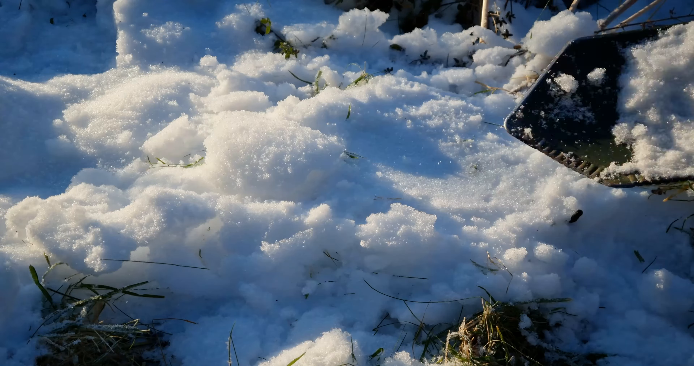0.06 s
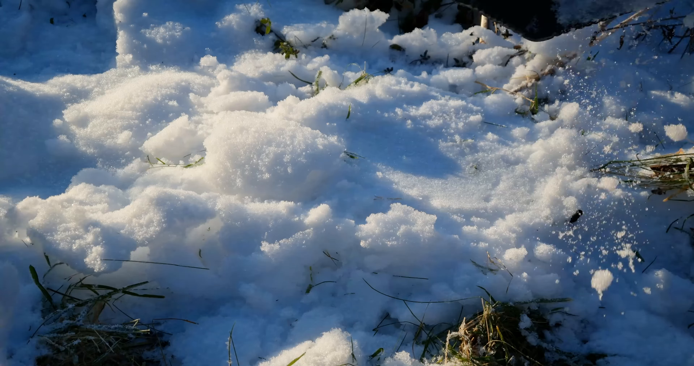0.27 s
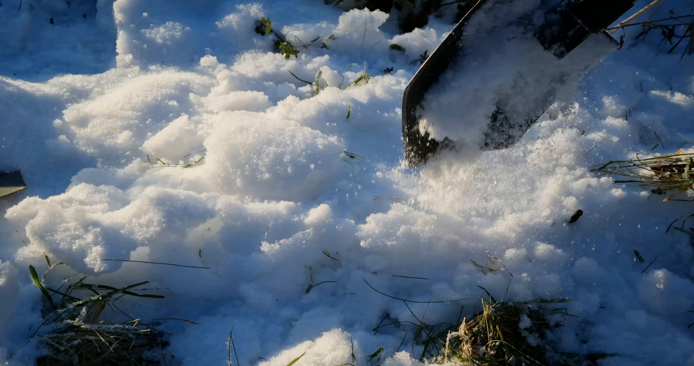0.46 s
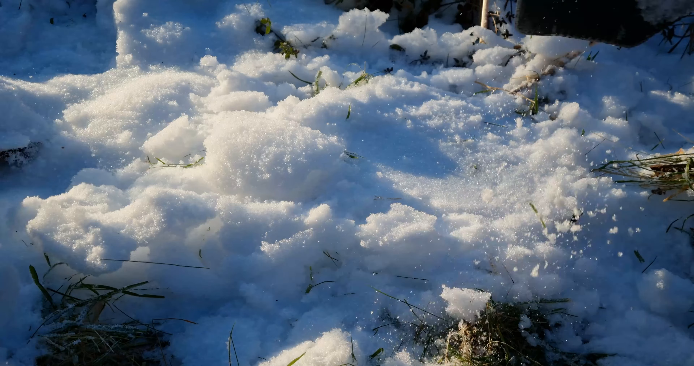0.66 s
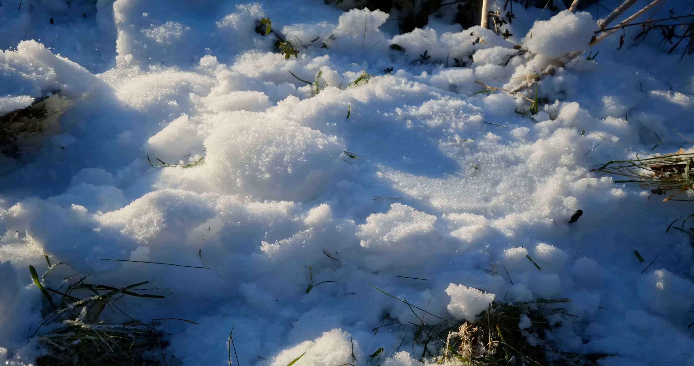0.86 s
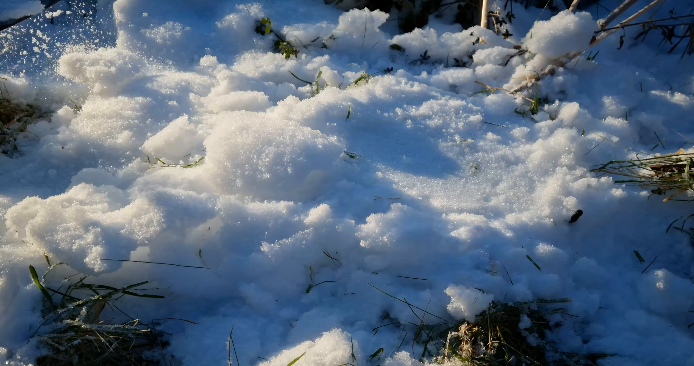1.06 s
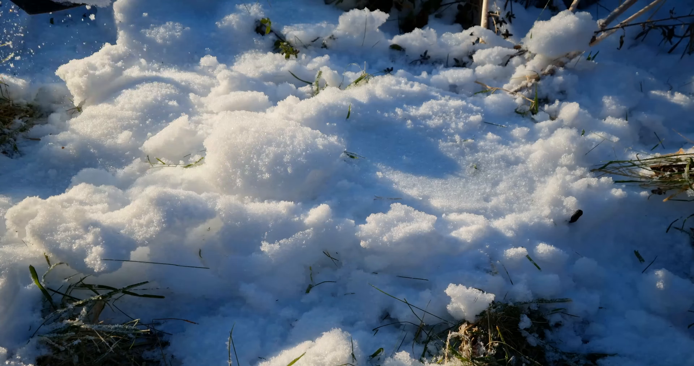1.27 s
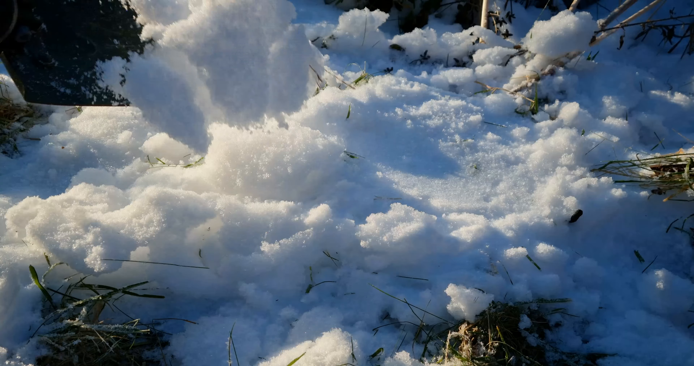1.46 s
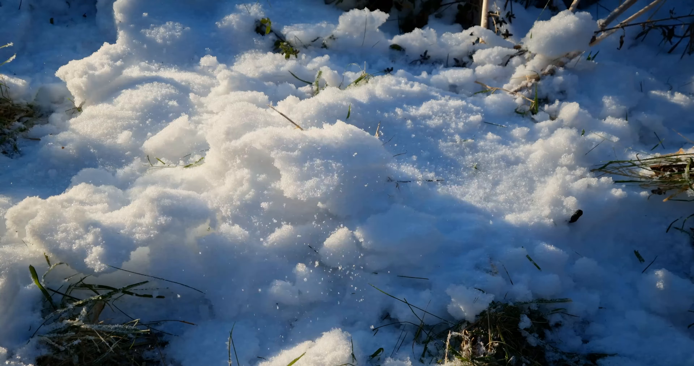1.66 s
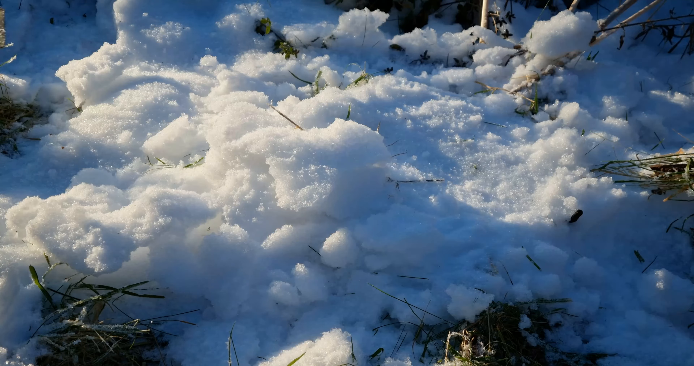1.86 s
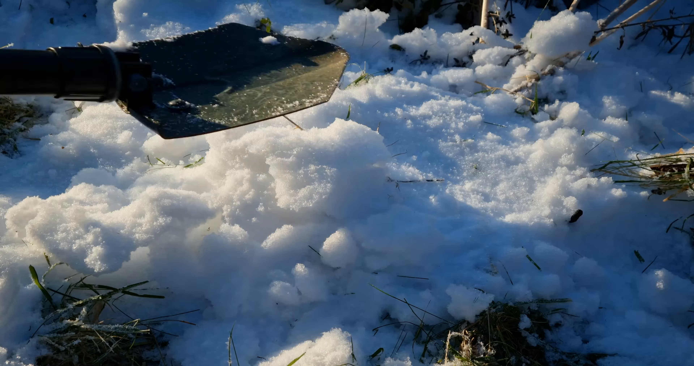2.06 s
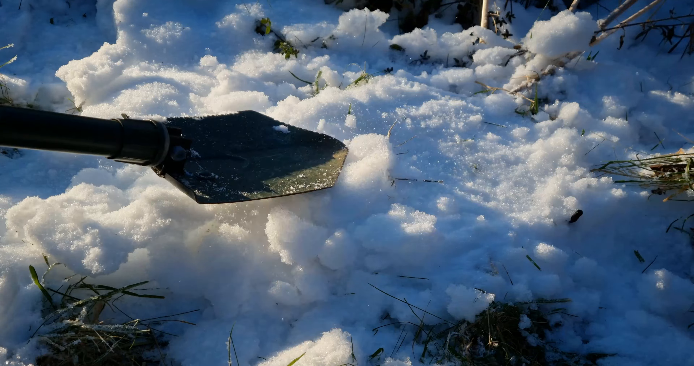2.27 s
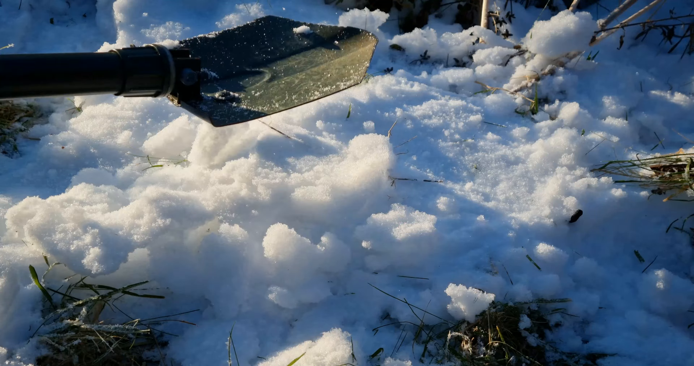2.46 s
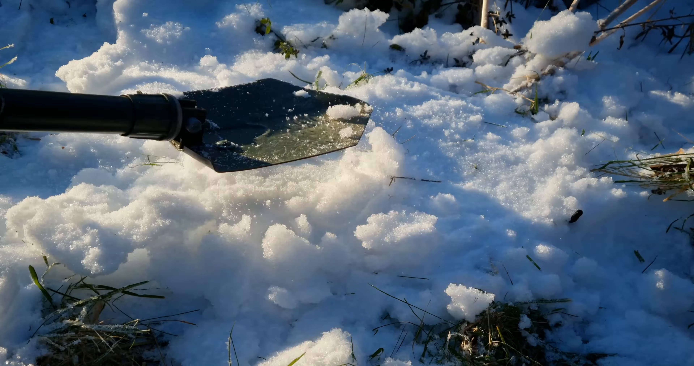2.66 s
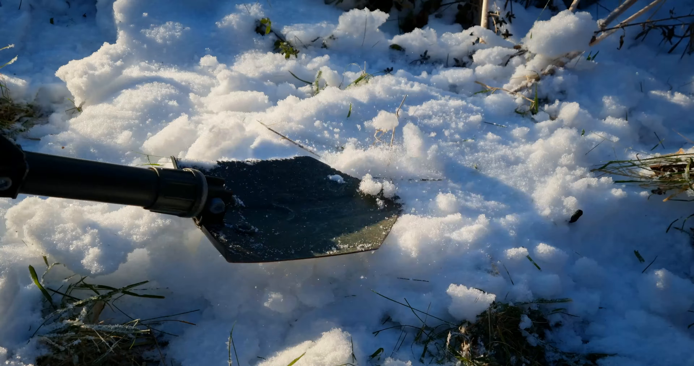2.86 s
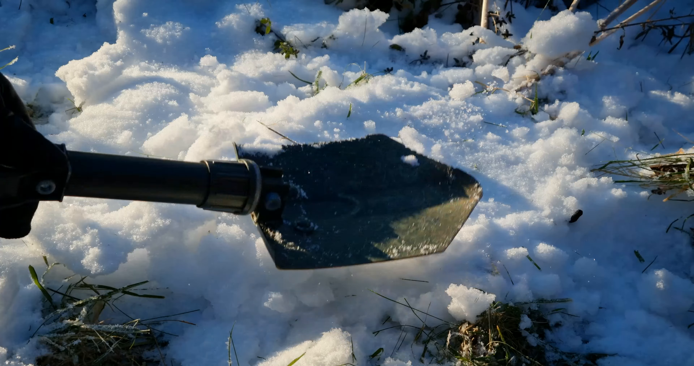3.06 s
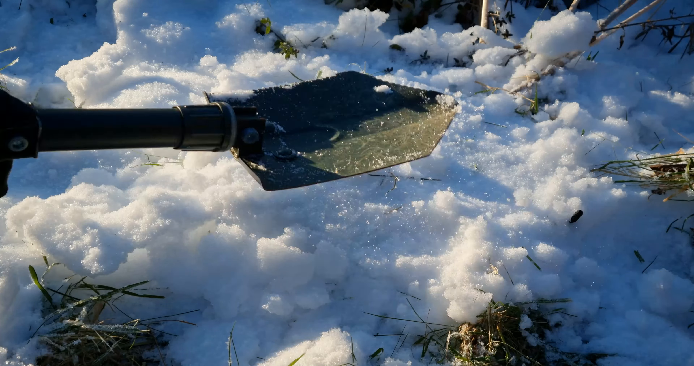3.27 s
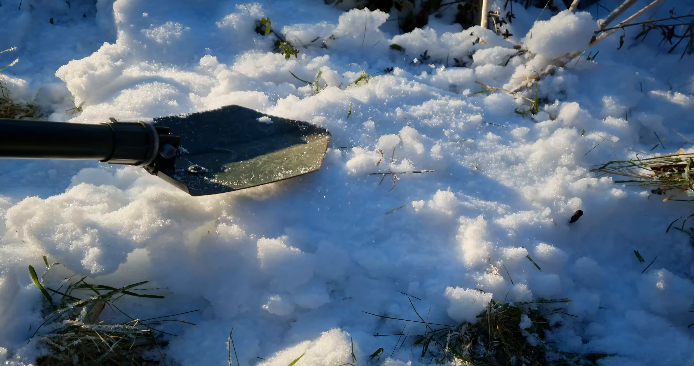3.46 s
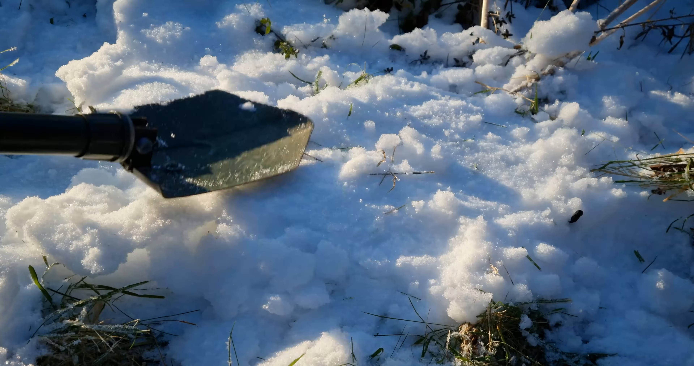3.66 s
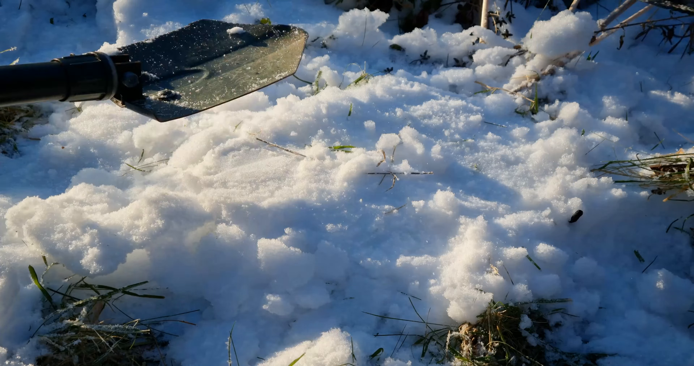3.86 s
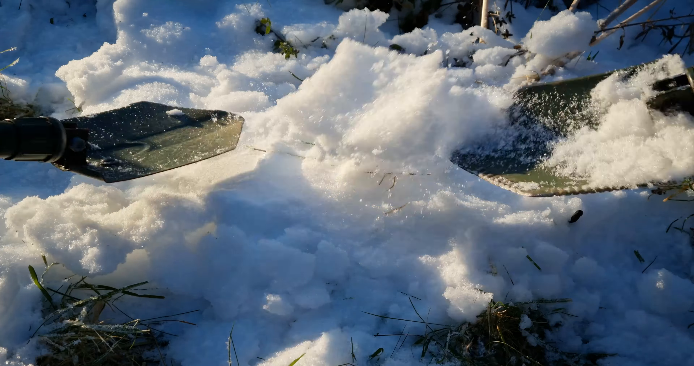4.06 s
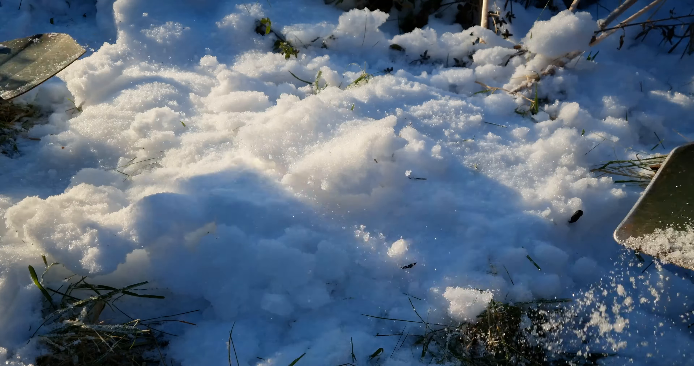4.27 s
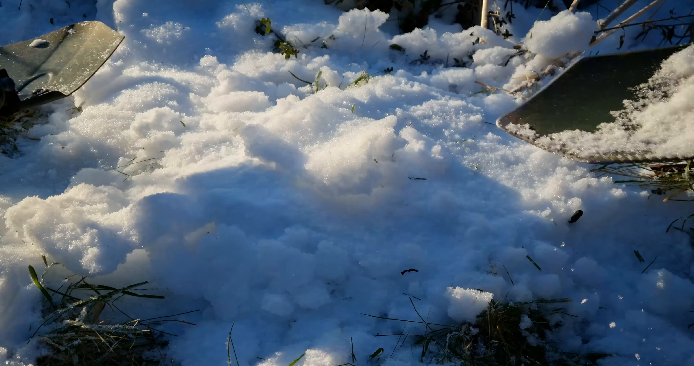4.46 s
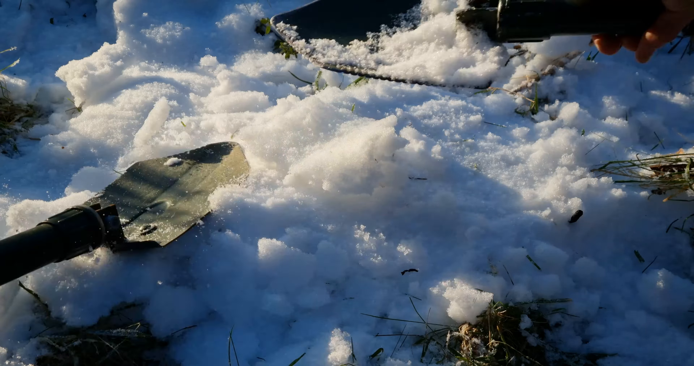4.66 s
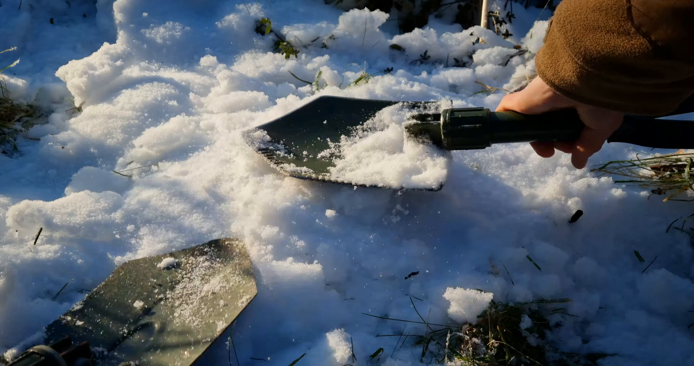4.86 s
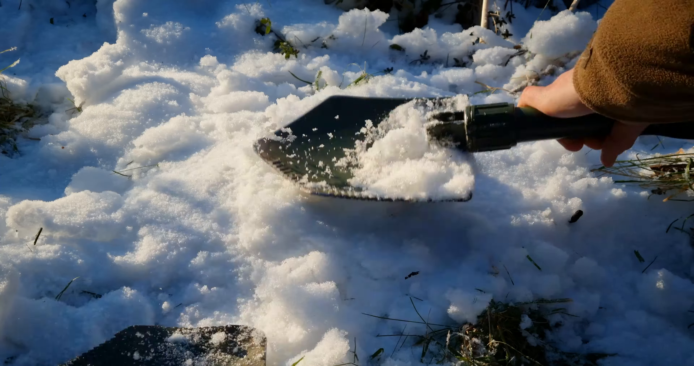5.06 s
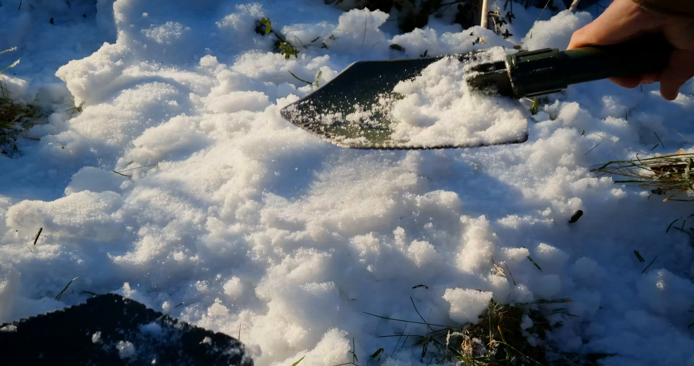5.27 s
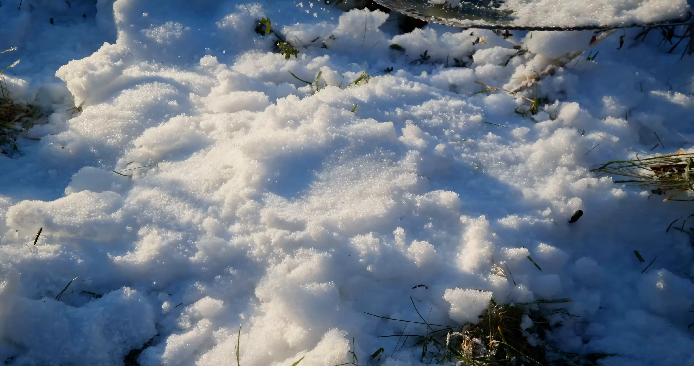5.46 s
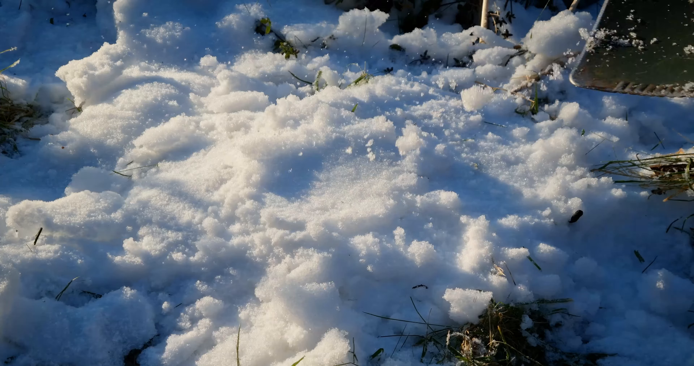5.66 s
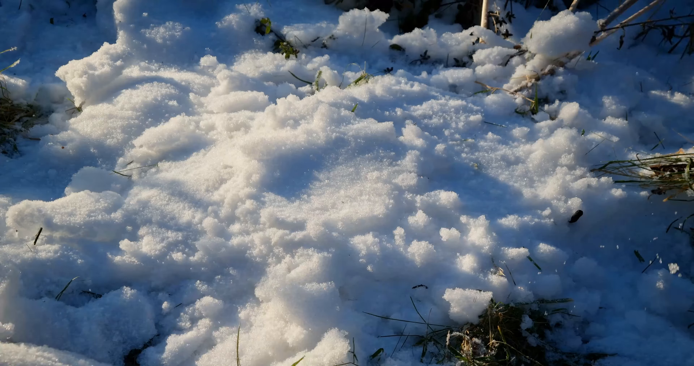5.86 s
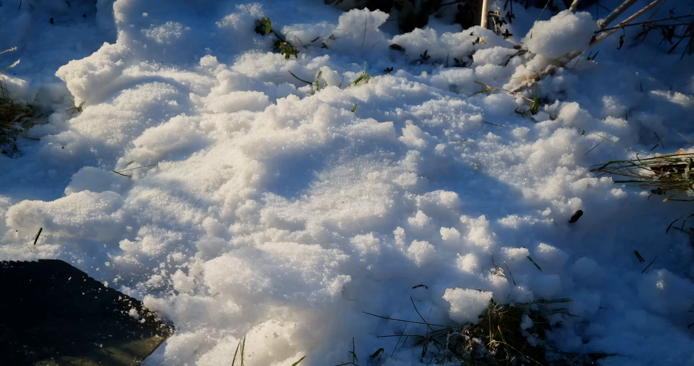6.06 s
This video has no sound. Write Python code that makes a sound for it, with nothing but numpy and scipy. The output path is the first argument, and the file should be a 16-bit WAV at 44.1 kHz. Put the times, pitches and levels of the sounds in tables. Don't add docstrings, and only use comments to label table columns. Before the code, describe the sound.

Two small steel shovels scrape, dump and pat crusty snow outdoors, with crisp bright crunches, brief metallic rings and a faint low hum.

```python
import sys
import numpy as np
from scipy import signal
from scipy.fft import rfft, irfft
from scipy.io import wavfile
from scipy.ndimage import map_coordinates

SR = 44100
rng = np.random.default_rng(int(sys.argv[2]) if len(sys.argv) > 2 else 0)


def natural_amplitude(level_db):
    exponent = np.asarray(level_db, float) / 20
    return 10 ** exponent


def put_to_file(sound):
    columns = np.atleast_2d(sound).T
    safe = np.clip(columns, -1, 1)
    whole_steps = np.round(safe * 32767)
    wavfile.write(sys.argv[1], SR, whole_steps.astype(np.int16))


N = 269892
LEFT_CREST_DB = 17.5

# [peak t/s, crunch level/dB, rise t/s, fall t/s, lumps re crunch level/dB]
LEFT_PUSHES = [(0.502, -38, 0.04, 0.18, -4.5), (0.6, -37.5, 0.15, 0.17, -8), (0.715, -45.5, 0.2, 0.04, -7),
               (4.824, -29, 0.034, 0.062, -29), (5.01, -32.5, 0.26, 0.079, -6.5),
               (5.1, -50.5, 0.071, 0.15, -12), (3.515, -44.5, 0.044, 0.027, -5),
               (5.168, -35.5, 0.015, 0.034, -19), (5.81, -31, 0.039, 0.11, -8.5),
               (5.862, -34.5, 0.055, 0.046, -24), (5.94, -44, 0.098, 0.038, -30),
               (6.11, -51.5, 0.026, .1, -6)]
# [t/s, peak level/dB, fall in 10 ms level/dB]
LEFT_CRACKS = [(0.452, -18, 24), (0.4665, -16.5, 16), (0.4396, -39, 20), (0.4984, -21, 20),
               (2.474, -27, 18), (2.6642, -27, -3), (3.0565, -25, 5), (3.097, -22, 21), (3.172, -11, 5),
               (0.544, -17, 26), (4.664, -9, 7), (4.818, -24, 10), (5.005, -21, 36), (5.102, -35, 1.5),
               (5.16, -15.5, 18), (5.188, -42, 12), (5.7775, -16.5, 3.5), (5.939, -25, 28.5),
               (6.0781, -27, 10), (6.0915, -33, 16)]
# [f/Hz, level per Hz/dB]
LEFT_CRUNCH = [(300, -18), (700, -9.5), (1300, -11), (2400, -1.5), (4200, 0), (8000, 1.5), (11000, -3.5),
               (13500, 1.5), (15400, -13)]
# [f/Hz, level per Hz/dB]
LEFT_LUMPS = [(80, -22), (150, -42), (250, -9), (400, -16.5), (740, 1), (1200, -0.5), (1800, 14.5),
              (3000, -48.5), (6000, -57)]
# [from t/s, to t/s, f/Hz, width f/Hz, level/dB]
FIRST_SCRAPE_TONES = [(.448, .47, 5850, 80, 10), (.48, .565, 711, 50, 8), (.53, .6, 1530, 80, 11),
                      (.575, .645, 1690, 90, 12), (.65, .735, 2050, 80, 8), (.47, .55, 4250, 70, 9),
                      (.57, .66, 4120, 76, 9), (.68, .75, 4150, 70, 4), (.49, .535, 5320, 70, 15),
                      (.49, .55, 4970, 50, 13), (.6, .68, 5360, 100, 8), (.64, .7, 770, 70, 3),
                      (.67, .74, 3350, 90, 5), (.535, .62, 6190, 45, 11), (.49, .52, 6500, 100, 8),
                      (.53, .59, 7840, 90, 10), (.645, .68, 3170, 50, 9), (.58, .66, 4680, 30, 9)]
# [from t/s, to t/s, f/Hz, width f/Hz, level/dB]
SCRAPE_TONES = [(4.775, 4.805, 1750, 150, 8), (4.87, 4.96, 3200, 60, 14), (4.89, 4.97, 5170, 50, 10),
                (4.88, 4.96, 6220, 40, 9), (4.88, 4.96, 6370, 40, 9), (4.95, 5.03, 5350, 70, 3),
                (4.99, 5.02, 7660, 70, 7), (4.79, 4.85, 3450, 200, 8), (4.815, 4.85, 5500, 200, 0),
                (4.92, 5.06, 800, 125, 2), (4.87, 4.96, 1740, 60, 17), (4.93, 5.05, 1860, 60, 16),
                (4.9, 5.04, 2150, 150, 7), (4.9, 5.05, 6650, 150, 4), (4.87, 4.96, 5480, 60, 7),
                (4.95, 5.0, 4800, 70, 7), (4.93, 5.04, 2620, 70, 12), (4.96, 5.04, 3250, 120, 7),
                (4.94, 5.055, 4120, 45, 12), (4.995, 5.02, 6500, 300, 6), (5.156, 5.21, 3500, 200, 4),
                (5.156, 5.2, 5500, 250, 3), (5.77, 5.83, 1790, 120, 4), (5.78, 5.82, 3450, 180, 8),
                (5.79, 5.91, 1630, 45, 12), (5.78, 5.9, 3311, 35, 7), (5.79, 5.84, 2620, 40, 4),
                (5.845, 5.9, 7450, 60, 10), (5.8, 5.93, 5370, 30, 9), (5.8, 5.93, 6450, 30, 8),
                (5.915, 5.98, 1497, 16, 23), (5.915, 5.965, 1631, 22, 22), (5.93, 5.99, 1340, 6, 23),
                (5.92, 5.98, 4242, 14, 14), (5.92, 5.97, 5787, 16, 14), (6.077, 6.12, 3000, 340, 0)]
# [from t/s, to t/s, f/Hz, width f/Hz, level/dB]
LYING_TONES = [(2.244, 2.3, 1600, 160, 6), (2.244, 2.262, 3450, 250, 5), (2.246, 2.285, 4900, 200, 2),
               (2.62, 2.65, 1500, 60, 14), (2.655, 2.7, 1640, 50, 10), (2.61, 2.76, 1340, 8, 13),
               (2.68, 2.83, 2800, 60, 19), (2.86, 2.92, 1550, 120, 4), (3.05, 3.068, 4800, 60, 14),
               (2.87, 2.9, 4350, 200, -1), (2.9, 2.98, 1640, 50, 8), (3.17, 3.215, 1620, 130, 4),
               (3.17, 3.21, 720, 90, 1), (3.21, 3.245, 511, 22, 5), (3.2, 3.25, 3305, 14, 14),
               (3.172, 3.2, 3400, 200, 2), (3.472, 3.53, 5450, 150, 5), (3.472, 3.49, 3150, 250, 3),
               (3.17, 3.2, 5950, 100, 8), (3.49, 3.54, 1640, 40, 9), (3.49, 3.545, 3315, 9, 18),
               (3.475, 3.52, 4200, 40, 8), (3.738, 3.76, 1550, 200, 5), (3.738, 3.76, 3550, 250, 3),
               (3.738, 3.76, 2700, 250, 3), (4.03, 4.07, 5400, 150, 3), (4.03, 4.07, 3350, 120, 5),
               (3.738, 3.76, 4300, 250, 8), (4.03, 4.07, 4150, 120, 4), (2.588, 2.61, 2600, 300, 3)]
# [f/Hz, share/1]
LEFT_LIKENESS = [(300, .8), (1500, .84), (4000, .8), (9000, .62), (15000, .5)]
# columns are t/s, peak level/dB, f/Hz
THUMPS = [
    (0.49, -41, 310),
    (0.492, -34, 710),
    (0.5, -46, 140),
    (2.605, -44, 400),
    (2.254, -50, 719),
    (2.592, -34.5, 652),
    (2.884, -41, 684),
    (3.478, -35, 512),
    (4.045, -38, 675),
]
# [t/s, left lead t/ms, left-right level/dB]
LEFT_PLACE = [(.6, .28, 4), (2.27, .11, 3.5), (2.9, .06, 4), (3.2, .01, 3.5), (3.48, .09, 3.8),
              (3.75, .115, 3.8), (4.05, .13, 4), (4.82, .02, 3), (4.88, .15, 5), (5.03, .17, 5),
              (5.17, 0, 3), (5.85, .29, 5)]


def left_shovel(grains):
    pat_cracks, settling, pat_tones = pats()
    cracks = [(s, db, -22.5, fall_db) for s, db, fall_db in LEFT_CRACKS]
    hits = bursts(pat_cracks + cracks, crest_db=LEFT_CREST_DB)
    stroke = pushes(LEFT_PUSHES + settling, follow=0.93)
    tones = FIRST_SCRAPE_TONES + SCRAPE_TONES + LYING_TONES + pat_tones
    sound, force = shovel(stroke, hits, (LEFT_CRUNCH, LEFT_LUMPS), tones, grains,
                          clump_db=1.23, likeness=LEFT_LIKENESS)
    ring_blade(sound, force)
    return turned(placed(muffled(sound) + thuds(THUMPS), LEFT_PLACE), 0.68)


# [crack t/s, peak level/dB, tip lead t/s, settling re peak level/dB, blade tone level/dB]
PATS = [
    (2.2481, -8, 0.0053, -6.5, -2.5),
    (2.592, -1, 0.0088, -31, 6.5),
    (2.8756, -1, 0.0098, -10.5, 1.5),
    (3.178, -3.5, 0.028, -16, 1.5),
    (3.477, -0.5, 0.0076, -25, 5),
    (3.743, 0.5, 0.02, -34, 6),
    (4.033, -1.5, .024, -20.5, 9),
]
# [t/s, peak level/dB, fall in 10 ms level/dB]
PAT_BREAKS = [
    (2.2617, -18, 13.5),
    (2.865, -21, 20),
    (2.887, 2.5, 29),
    (3.182, -8, 38),
    (3.7464, -9, 28),
    (4.038, -2, 35),
]
# [f/Hz, width f/Hz, level/dB]
PAT_LOADED = [(1800, 190, -1.5), (5170, 1400, -15.5)]


def pats():
    lumps_db, contact_s = -40, 0.058
    cracks = [(s, peak_db, lumps_db, fall_db) for s, peak_db, fall_db in PAT_BREAKS]
    settling, loaded = [], []
    for s, peak_db, lead, settle_db, tone_db in PATS:
        cracks.append((s - lead, peak_db - 23.5, lumps_db, 2.5))
        cracks.append((s, peak_db, lumps_db, 17.5))
        settling.append((s + 0.026, peak_db + settle_db - LEFT_CREST_DB, 0.031, 0.02, -17.5))
        for hz, width_hz, db in PAT_LOADED:
            loaded.append((s - contact_s / 4, s + contact_s, hz, width_hz, db + tone_db))
    return cracks, settling, loaded


# [f/Hz, level/dB, t60 t/s]
LEFT_BLADE = [(1340, -14, .4), (1497, -8, .16), (1633, -6, .1), (2620, -14, .1), (2767, -14, .25),
              (3311, -10, .3), (3855, -17, .2), (4260, -9, .12), (5134, -12, .1), (5375, -10, .15),
              (5787, -9, .09), (5955, -16, .15), (6460, -16, .12), (7458, -11, .06)]
# [f/Hz, level/dB, t60 t/s]
BLADE_TIP = [(1637, -3, .11), (2767, -6, .29), (3340, -2, .4), (4296, -2, .13), (5373, 0, .11),
             (6207, -8, .14), (6600, -8, .06)]
# [from t/s, to t/s, drive level/dB, share of free t60/1, pitch factor/1]
RINGING = [
    (.47, .6, -27, .35, .97),
    (.58, .73, -27, .35, 1.03),
    (4.86, 5.06, -25, .4, .99),
    (5.09, 5.13, -28, .5, 1.0),
    (5.79, 5.9, -28, .6, 1.0),
    (5.88, 5.99, -27.5, .7, 1.0),
    (6.07, 6.12, -35, .4, 1.0),
]
# [from t/s, to t/s, drive level/dB, share of free t60/1, pitch factor/1]
TIP_RINGING = [
    (2.6, 2.7, -51, 0.7, 0.9),
    (3.17, 3.22, -43, 0.63, 1.0),
    (3.474, 3.535, -42, 1, 0.994),
    (4.04, 4.07, -40, 0.3, 1.0),
]


def ring_blade(sound, force):
    crowd_hz = np.linspace(4100, 11500, 12) + rng.uniform(-60, 60, 12)
    crowd = [(hz, -11 - hz / 2500, .1) for hz in crowd_hz]
    for moments, modes in (RINGING, LEFT_BLADE + crowd), (TIP_RINGING, BLADE_TIP):
        for start, end, drive_db, free, shift in moments:
            for hz, level_db, t60 in modes:
                i, tone = driven(force, start, end, hz * shift, t60 * free)
                aim_db = rng.normal(0, 1.5, (2, 1))
                sound[:, i:i + len(tone)] += tone * natural_amplitude(drive_db + level_db + aim_db)


# [t/s, level/dB]
MUFFLE = [(0.6, -1), (2.3, -3), (3.25, 2), (3.45, -4), (4.1, -3.5), (4.8, -1), (5.9, 1.5)]


def muffled(pair):
    top_db, = in_time(MUFFLE)
    hz = np.linspace(0, SR / 2, N // 2 + 1)
    top = irfft(rfft(pair) / (1 + (10800 / (hz + 1)) ** 8), N)
    return pair + (natural_amplitude(top_db) - 1) * top


# [peak t/s, crunch level/dB, rise t/s, fall t/s, lumps re crunch level/dB]
RIGHT_PUSHES = [(0.172, -62.5, 0.11, 0.02, 0), (0.39, -65, 0.025, 0.08, 0), (0.125, -66, 0.3, 0.12, 0),
                (0.434, -70.5, 0.098, .05, 7), (0.815, -44, 0.057, 0.17, -8), (0.95, -51, 0.18, 0.16, 6.5),
                (1.13, -48.5, 0.5, 0.091, 3), (1.364, -48.5, 0.26, 0.039, 0), (1.5, -60.5, 0.21, 0.15, 3),
                (1.596, -44, 0.037, 0.13, -9.5), (1.866, -52, 0.033, 0.38, -17),
                (2.052, -37.5, 0.23, 0.19, -17), (2.372, -43.5, 0.32, 0.13, -6),
                (2.64, -48, 0.17, 0.34, -9.5), (2.92, -44, 0.14, 0.16, -8.5), (3.15, -50, 0.18, 0.27, -4),
                (3.47, -46.5, 0.051, 0.1, -3), (3.71, -67.5, 0.24, 0.67, 5.5),
                (4.04, -50, 0.054, 0.17, -4.5), (4.136, -34.5, 0.019, 0.017, -32),
                (4.17, -46, 0.014, 0.29, -6), (4.425, -52, 0.042, 0.08, 3), (3.65, -61, 0.036, 0.032, 0),
                (3.285, -54, 0.042, .02, -2), (4.565, -38.5, 0.059, 0.24, -3.5),
                (4.658, -30, 0.13, 0.2, -7), (5.2, -55, 0.13, 0.28, -1), (5.476, -62.5, 0.15, 0.59, -0.5),
                (5.77, -57.5, 0.23, 0.8, 3)]
# [t/s, peak level/dB, fall in 10 ms level/dB]
CLODS = [(0.775, -33, 15), (0.8112, -31, 9), (0.9628, -28, 20), (1.0841, -24, 32), (1.116, -24, 15),
         (1.303, -34, 15), (0.38, -44, 15), (1.187, -28, 23), (1.587, -19, 5.5), (1.839, -34.5, 0),
         (4.127, -17.5, 19), (4.2773, -25, 16), (4.5131, -41, -1), (4.56, -19.5, -2.5), (4.655, -16, 10),
         (4.633, -16, 32), (4.679, -23, 31), (4.7, -26, 20), (4.71, -18, 28), (5.264, -34, 27),
         (5.297, -37, 26), (5.451, -39, 22), (0.155, -41, 24), (1.208, -32, 20), (4.372, -44, 25)]
# [t/s, peak level/dB, f/Hz, crumbs re knock level/dB]
THUDS = [(0.892, -51, 312, 20), (0.964, -42, 340, -11), (0.989, -42, 450, 0), (1.119, -32, 500, 4),
         (1.125, -40, 325, 2), (1.223, -45.5, 479, 14), (1.6238, -53, 344, 21), (2.379, -39.5, 460, 14.5),
         (2.494, -47, 604, 14), (2.988, -41.5, 650, -3), (3.05, -50, 530, 8), (3.088, -50, 700, 8),
         (3.283, -44.5, 356, -1), (4.278, -41, 524, 14.5), (4.298, -45, 340, 11.5), (4.419, -48.5, 320, 9),
         (4.701, -39, 524, 4), (5.4797, -59, 400, 20), (5.655, -39, 540, -1), (5.664, -39, 423, 2)]
# [f/Hz, level per Hz/dB]
RIGHT_CRUNCH = [(500, -17.5), (900, -1), (1300, -2), (2770, -3), (5000, -2), (8800, -4.5), (11500, -7.5),
                (13900, -2.5), (15400, -3.5)]
# [f/Hz, level per Hz/dB]
RIGHT_LUMPS = [(70, -18.5), (120, -8), (340, -2.5), (880, 0.5), (1300, 1), (2000, -7), (3200, -17),
               (6000, -80.5)]
# [from t/s, to t/s, f/Hz, width f/Hz, level/dB]
RIGHT_LOADED = [(0.79, 0.94, 1550, 200, -24), (0.796, 0.846, 3540, 150, 5), (1.587, 1.647, 2220, 50, 2),
                (1.6, 1.714, 2640, 50, -1), (1.826, 1.895, 2175, 60, 4), (1.837, 1.915, 2700, 60, -5),
                (1.972, 2.166, 2720, 59.5, -1), (4.128, 4.165, 560, 60, 1.5), (5.642, 5.661, 2880, 300, 15),
                (5.474, 5.488, 1820, 300, 17), (1.575, 1.624, 3600, 120, -3), (1.939, 2.15, 1520, 255, -2),
                (1.942, 2.091, 3660, 200, -11), (4.124, 4.16, 2223, 25, 13.5),
                (4.125, 4.155, 3500, 101, 19.5), (4.54, 4.64, 1140, 258, 6), (4.552, 4.778, 1380, 303, 7)]
# [f/Hz, share/1]
RIGHT_LIKENESS = [(300, 0.72), (1300, 0.94), (3700, 0.31), (12000, 0.17)]
# [t/s, left lead t/ms, left-right level/dB]
RIGHT_PLACE = [(0.998, -0.38, 0), (4.601, -0.311, 1), (5.6, -0.37, 3)]


def right_shovel(grains):
    crisp = [(s, db, -45, fall_db) for s, db, fall_db in CLODS]
    crumbs = [(s, db + crumb_db, 4, 10.5) for s, db, _, crumb_db in THUDS]
    hits = bursts(crisp + crumbs, crest_db=18.0)
    stroke = pushes(RIGHT_PUSHES, follow=0.72)
    sound, _ = shovel(stroke, hits, (RIGHT_CRUNCH, RIGHT_LUMPS), RIGHT_LOADED, grains,
                      clump_db=2.0, likeness=RIGHT_LIKENESS)
    knocks = thuds([row[:-1] for row in THUDS])
    return turned(placed(sound + knocks, RIGHT_PLACE), -0.49)


def shovel(stroke, hits, colours, loaded, grains, clump_db, likeness):
    crunch_db, lumps_db = stroke
    crunch_hits, lump_hits, knocks = hits
    clumps = natural_amplitude(clump_db * drift(37))
    force = grains * (natural_amplitude(crunch_db) * clumps + crunch_hits)
    lump_gain = natural_amplitude(crunch_db + lumps_db + 1.9 * drift(23.0))
    crumbling = grains * (lump_gain * clumps + lump_hits) + knocks
    crunch_colour, lump_colour = colours
    out = signal.fftconvolve(force, [causal(crunch_colour)])[:, :N]
    out = out + signal.fftconvolve(crumbling, [causal(lump_colour)])[:, :N]
    for start, end, hz, width_hz, level_db in loaded:
        t60 = np.log(1000) / np.pi / width_hz
        i, tone = driven(force, start, end, hz, t60)
        out[:, i:i + tone.shape[1]] += tone * natural_amplitude(level_db + 5.5) * 2 * np.pi * width_hz / SR
    return two_ports(out, likeness), force[0]


def crackle(per_s, size_db, cycles, patchy_db):
    sizes = natural_amplitude(size_db * np.minimum(rng.exponential(1, (2, N)), 4)) * rng.choice([-1, 1], (2, N))
    breaks = sizes * (rng.random((2, N)) < per_s / SR)
    pitches = np.geomspace(170, 15000, 24)
    shares = np.cumsum(pitches) / np.sum(pitches)
    dealt = np.searchsorted(shares, rng.random((2, N)))
    out = np.zeros((2, N))
    for k, hz in enumerate(pitches):
        patches = natural_amplitude(patchy_db * drift(10.5))
        out += np.sqrt(hz) * patches * rms_one(ring(breaks * (dealt == k), hz, cycles / hz))
    return rms_one(out)


def bursts(rows, crest_db):
    out = np.zeros((3, N))
    for s, peak_db, lumps_db, fall_db in rows:
        i = round(s * SR)
        t = np.arange(min(N - i, SR // 5)) / SR
        build = 1 - np.exp(-t / .0016)
        envelope = build * natural_amplitude(peak_db - crest_db - max(fall_db, 4) * t / .01)
        out[0, i:i + len(t)] += envelope
        out[1, i:i + len(t)] += envelope * natural_amplitude(lumps_db)
        out[2, i] += natural_amplitude(peak_db - crest_db + lumps_db - 3.0)
    return out


def pushes(rows, follow):
    t = np.arange(0, N + 32, 32) / SR
    s, peak_db, rise, fall, lumps_db = np.transpose(rows)[:, :, None]
    down_db = 20 * np.where(t < s, (s - t) / rise, (t - s) / fall) ** 1.336
    crunch = power_sum_db(peak_db - down_db)
    lumps = power_sum_db(peak_db + lumps_db - follow * down_db)
    return in_time(np.transpose([t, crunch, lumps - crunch]))


def thuds(rows):
    out = np.zeros(N)
    t = np.arange(SR // 20) / SR
    for s, peak_db, hz in rows:
        i = round(s * SR)
        fall_db = 60 * t * hz / 13.2
        out[i:i + len(t)] += natural_amplitude(peak_db + 5.0 - fall_db) * np.sin(2 * np.pi * hz * t)
    return out


def driven(force, start, end, hz, t60):
    i, held = round(start * SR), round((end - start) * SR)
    part = force[..., i - 1:i + held + round(t60 * SR)]
    push = np.diff(part) / (2 * np.sin(np.pi * hz / SR))
    t = np.arange(push.shape[-1]) / held
    fade = np.clip(np.minimum(t, 1 - t) * 5, 0, 1)
    return i, ring(push * fade, hz, t60)


def ring(x, hz, t60):
    r, w = natural_amplitude(-60 / (t60 * SR)), 2 * np.pi * hz / SR
    return signal.lfilter([0, np.sin(w)], [1, -2 * r * np.cos(w), r * r], x + 1e-18)


# [f/Hz, level per Hz/dB]
AIR = [(15, -30), (25, -12), (64, 4), (82, -1.5), (151, -13), (252, -19.5), (431, -25), (535, -22.5),
       (1080, -24.5), (2680, -34.5), (3700, -36), (7240, -45), (11100, -52.5), (13800, -42), (15400, -48)]
# [f/Hz, share/1]
AIR_LIKENESS = [(50, 0.94), (150, 0.95), (400, 0.054), (1500, 0)]
# [t/s, level/dB]
ENGINE = [(0.0, -44), (0.78, -48), (0.89, -58), (1.33, -74), (1.57, -49), (1.74, -54), (1.91, -41.5),
          (2.06, -57), (2.16, -43.5), (2.5, -55), (4.02, -54.5), (5.4, -56), (6.12, -82)]


def distance():
    air = signal.fftconvolve(rng.standard_normal((2, N + SR)), [causal(AIR)])[:, SR:SR + N]
    engine_db, = in_time(ENGINE)
    mains = natural_amplitude(-53 + 2.5 * drift(2.2)) * np.sin(2 * np.pi * 50.2 * np.arange(N) / SR)
    engine_hz = 64 + 0.56 * drift(2.4)
    engine = natural_amplitude(engine_db + 1.0) * np.sin(2 * np.pi * np.cumsum(engine_hz) / SR)
    return turned(natural_amplitude(-53) * two_ports(air, AIR_LIKENESS) + mains + engine, -0.83)


def two_ports(pair, likeness):
    left, other = rfft(pair)
    alike = np.clip(at_hz(likeness, np.linspace(0, SR / 2, len(left))), 0, 1)
    right = alike * left + np.sqrt(1 - alike ** 2) * other
    return np.array([pair[0], irfft(right, N)])


def placed(pair, place):
    lead_ms, pan_db = in_time(place)
    late = map_coordinates(pair[1], [np.arange(N) - lead_ms * SR / 1000], order=3)
    return np.array([pair[0] * natural_amplitude(pan_db / 2), late * natural_amplitude(-pan_db / 2)])


def turned(pair, turn):
    hz = np.linspace(0, SR / 2, N // 2 + 1)
    lag = turn * hz / (hz + 76) / (1 + (hz / 2500) ** 2)
    return np.array([pair[0], irfft(rfft(pair[1]) * np.exp(-1j * lag), N)])


def causal(spectrum):
    cepstrum = irfft(at_hz(spectrum, np.linspace(0, SR / 2, 4097)) * np.log(10) / 20)
    cepstrum[1:4096] *= 2
    cepstrum[4097:] = 0
    response = irfft(np.exp(rfft(cepstrum)))
    return response / np.sqrt(np.sum(response ** 2))


def drift(rate):
    r = np.exp(-80 * np.pi * rate / SR)
    slow = signal.lfilter([1], [1, -2 * r, r * r], rng.standard_normal(N // 40 + 2002))[2000:]
    return np.interp(np.arange(N) / 40, np.arange(len(slow)), rms_one(slow))


def rms_one(x):
    return x / np.sqrt(np.mean(x ** 2) + 1e-20)


def power_sum_db(db):
    return 10 * np.log10(np.sum(natural_amplitude(2 * db), axis=0) + 1e-12)


def in_time(rows):
    s, *columns = np.transpose(rows)
    return [np.interp(np.arange(N) / SR, s, c) for c in columns]


def at_hz(points, hz):
    point_hz, value = np.transpose(points)
    return np.interp(np.log(hz + 1), np.log(point_hz), value)


def scene():
    grains = crackle(per_s=14000, size_db=2.5, cycles=19.0, patchy_db=1.2)
    other_grains = np.roll(grains, N // 2, axis=1)
    return left_shovel(grains) + right_shovel(other_grains) + distance()


def roll_off(x):
    return signal.sosfilt(signal.butter(12, 15520, fs=SR, output="sos"), x)


def record(dry):
    cut = signal.sosfilt(signal.ellip(12, .3, 50, 14650, fs=SR, output="sos"), dry)
    return roll_off(cut)


dry = scene()
out = record(dry)
put_to_file(out)
```